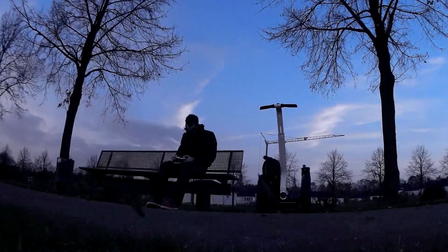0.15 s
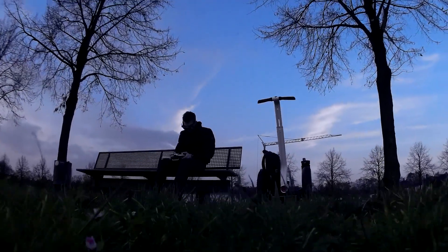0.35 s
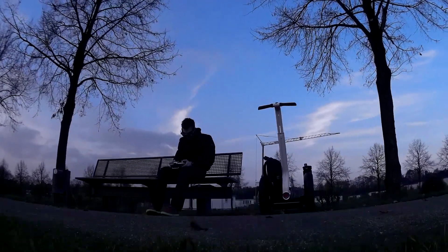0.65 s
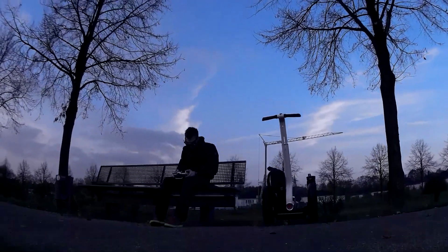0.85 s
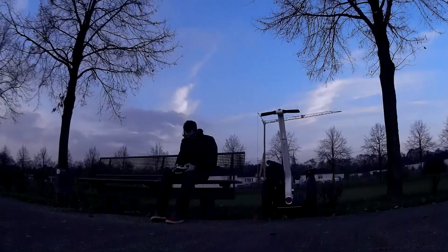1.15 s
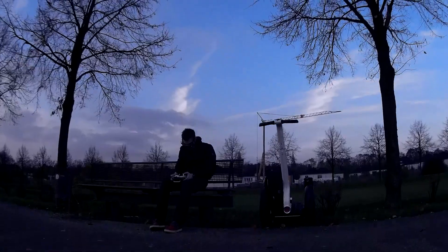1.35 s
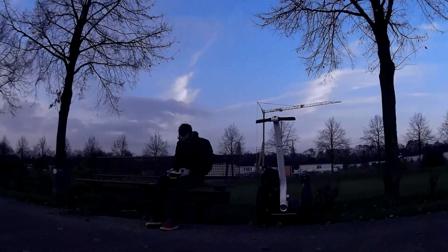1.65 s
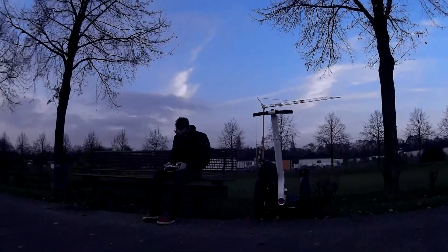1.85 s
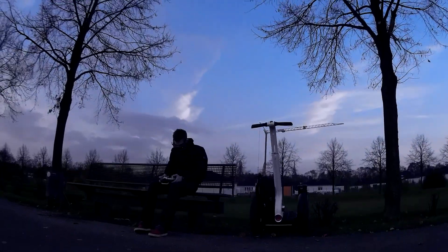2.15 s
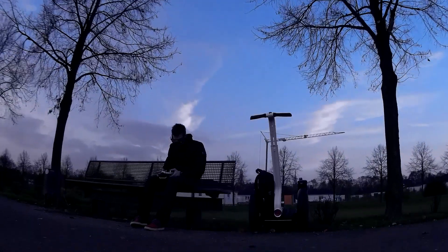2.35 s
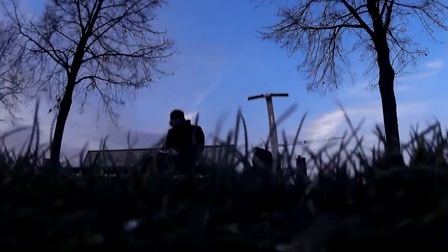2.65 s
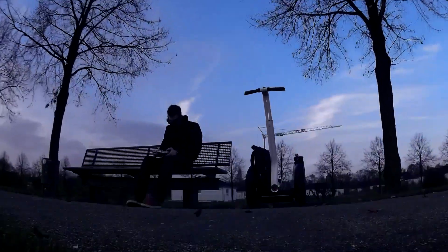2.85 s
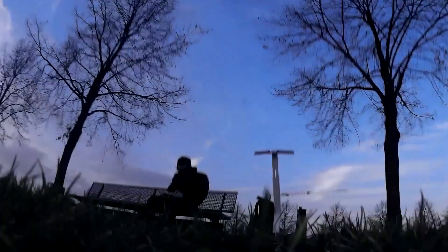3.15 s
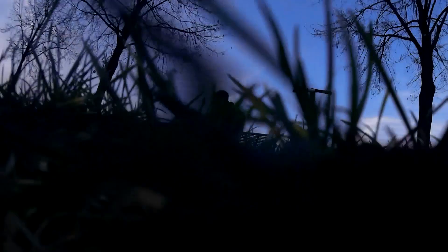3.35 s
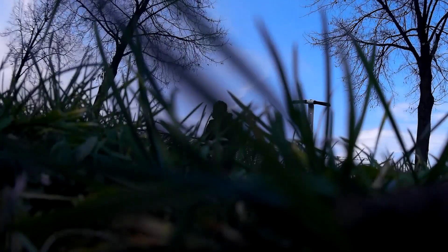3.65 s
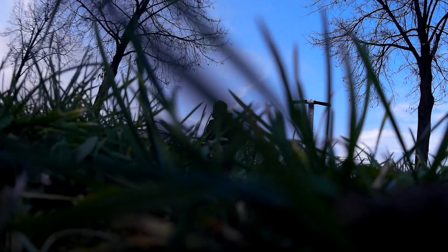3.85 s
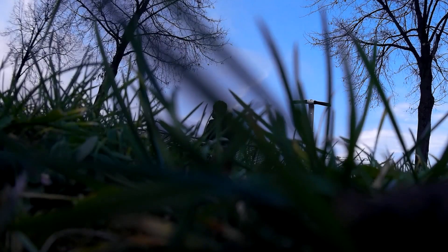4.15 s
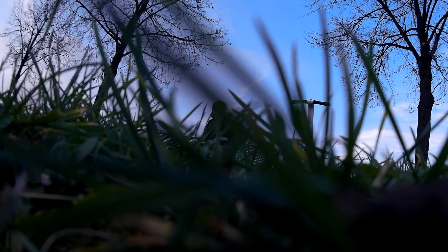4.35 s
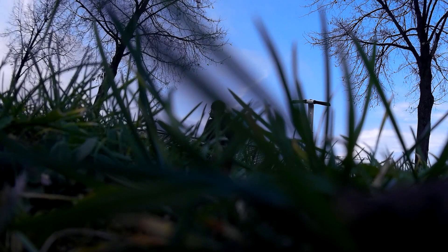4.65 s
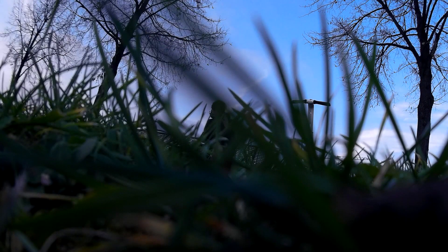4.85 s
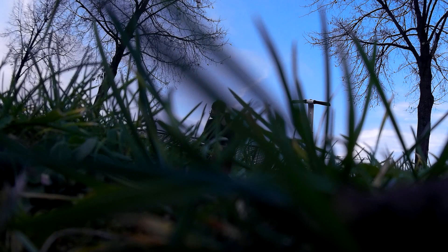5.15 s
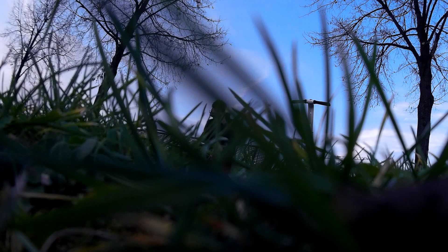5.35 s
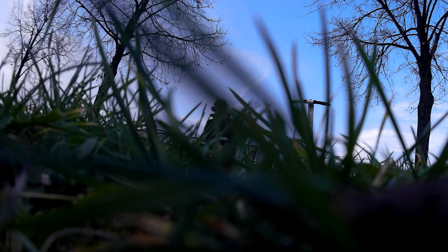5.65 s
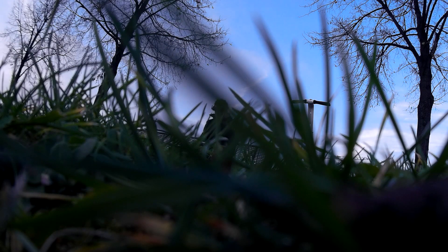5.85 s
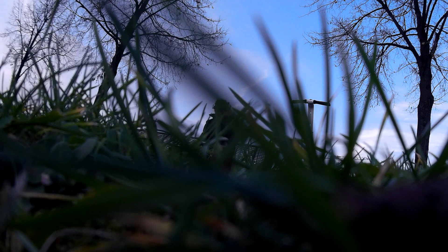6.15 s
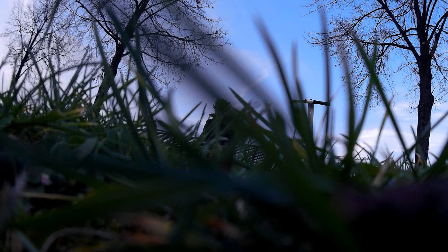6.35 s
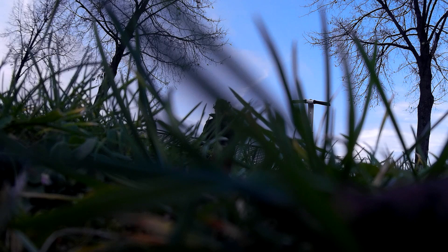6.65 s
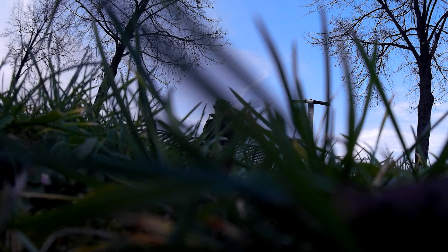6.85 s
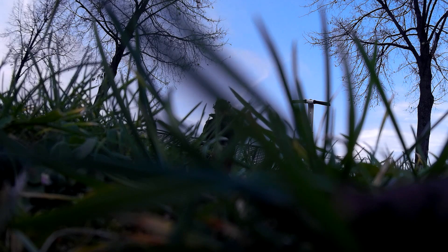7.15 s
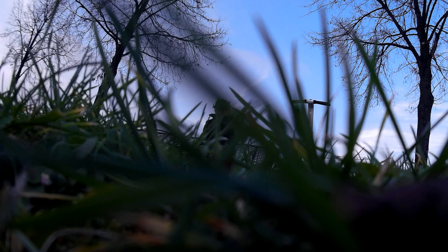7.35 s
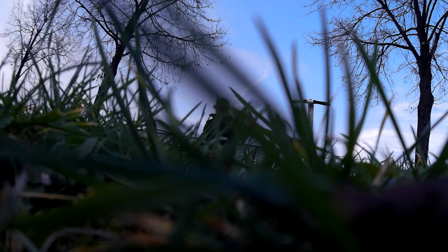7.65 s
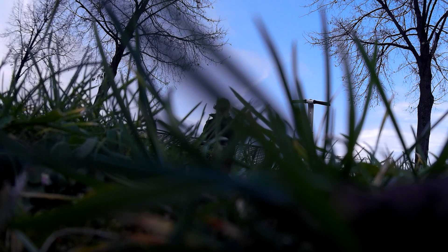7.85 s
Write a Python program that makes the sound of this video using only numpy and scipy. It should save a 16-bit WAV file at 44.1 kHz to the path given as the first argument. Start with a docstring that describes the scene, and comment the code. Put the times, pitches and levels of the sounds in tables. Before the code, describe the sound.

Four beating drone motors hover, scrape down into long grass, thrash and snap stalks, then stop, leaving quiet far-off road noise.

```python
"""Small quadcopter hovering low, heard from on board: four motors beat against each other.
Each motor sums blade tone, overtones, shaft lines and magnetic whine; filtered noise adds wash and wind.
It dips through its own downwash, throttles back, brushes the ground and drops into long grass.
Idling propellers thrash and snap stalks: random hits through frame and blade resonances.
Motors run down; an arm rings, faint high hiss in narrow bands comes and goes, traffic noise stays."""
import sys
import numpy as np
from scipy.fft import rfft, irfft, next_fast_len
from scipy.io import wavfile
from scipy.ndimage import map_coordinates

SR = 44100
rng = np.random.default_rng(int(sys.argv[2]) if len(sys.argv) > 2 else 0)


def unload_wav(signal):
    """Save mono or channel-first audio to the path in sys.argv[1] as 16-bit WAV at rate SR, clipped to [-1, 1]."""
    wavfile.write(
        sys.argv[1],
        SR,
        np.round(np.clip(np.atleast_2d(signal).T, -1, 1) * 32767).astype(np.int16),
    )


N = 353241

# frame resonances: f/Hz, width/Hz, relative level/dB
FRAME_MODES = [(897, 27, 3), (1123, 22, 13), (1345, 78, 2.5), (1792, 40, 3), (2562, 25, -6.5),
               (4583, 120, -28)]
# struck propeller blade resonances: f/Hz, width/Hz, relative level/dB
BLADE_MODES = [(2641, 52, 1), (4480, 85, -12.5)]
# low-frequency air and thud noise spectrum: f/Hz, relative density/dB
AIR_SPECTRUM = [(8.8, -29), (15, 1), (91, -2), (123, -2), (204, -5), (275, -15), (330, -2), (430, -32.5),
                (730, -120)]

HOVER_HZ, IDLE_HZ = 400, 110  # reference blade rates
LAND_S, OFF_S = 3.24, 4.28  # landing, power cut
LET_GO_S = 0.069  # grass contact eases over this time after power cut


def amp(db):
    """Decibels to gain."""
    return 10 ** (np.asarray(db) / 20)


def unit(x):
    """Scale to rms 1."""
    return x / np.sqrt(np.mean(x ** 2) + 1e-20)


def decades(rate, reference):
    """Speed in powers of ten above a reference."""
    return np.log10(rate / reference + 1e-6)


def curves(rows):
    """Interpolate each column after the time, per sample."""
    time_s, *columns = np.transpose(rows)
    return [np.interp(np.arange(N) / SR, time_s, column) for column in columns]


def during(start_s, end_s, fade_s):
    """1 from start to end, linear fades to 0 outside."""
    t = np.arange(N) / SR
    return np.clip(1 + np.minimum(t - start_s, end_s - t) / fade_s, 0, 1)


def ramp(start_s, length_s):
    """0 before start, rising linearly to 1 over the length."""
    return np.clip((np.arange(N) / SR - start_s) / length_s, 0, 1)


def swell(centre_s, sigma_s):
    """Gaussian swell, peak 1."""
    return np.exp(-.5 * ((np.arange(N) / SR - centre_s) / sigma_s) ** 2)


def wobble(knots_per_s):
    """Smooth random curve: spline through normal knots."""
    knots = rng.standard_normal(SR // 10)
    coarse = np.arange(0, N, 16)
    values = map_coordinates(knots, [coarse * knots_per_s / SR], mode="mirror")
    return np.interp(np.arange(N), coarse, values)


def filtered(x, response):
    """Multiply the spectrum of x by a response of frequency."""
    m = next_fast_len(N + SR // 2)
    return irfft(rfft(x, m) * response(np.fft.rfftfreq(m, 1 / SR)), m)[:N]


def shaped(x, spectrum):
    """Filter x by f/Hz, gain/dB points on a log frequency axis."""
    f, db = np.transpose(spectrum)
    return filtered(x, lambda hz: amp(np.interp(np.log(hz + 1), np.log(f), db)))


def ring(x, modes):
    """Parallel second-order resonances of alternating sign."""
    def response(f):
        total = 0
        for k, (centre, width, db) in enumerate(modes):
            damping = 1j * f * width
            total = total + (-1) ** k * amp(db) * damping / (centre * centre - f * f + damping)
        return total
    return filtered(x, response)


def noise(spectrum):
    """Coloured noise of rms 1."""
    return unit(shaped(rng.standard_normal(N), spectrum))


def speed(pair, share, steer, braked_s, settle_s, idle_hz, off_s, run_down_s, exponent):
    """Blade rate/Hz: follows throttle, is braked, freewheels to idle, runs down when switched off."""
    # hover blade rates: t/s, faster pair/Hz, steering trim (+ on one, - on the other)/Hz, slower pair/Hz
    throttle = [(0, 418, 31, 356), (.16, 436, 30, 356), (.35, 482, 23, 394), (.56, 480, 16, 422),
                (.73, 472, 11, 427), (.86, 453, 13, 388), (.95, 441, 19, 375), (1.01, 475, 21, 385),
                (1.15, 469, 17, 398), (1.44, 438, 14.7, 374), (1.55, 438, 10, 373), (1.67, 436, 10.5, 371),
                (1.86, 424, 8, 367), (1.95, 435, 8.5, 372), (2.06, 414, 8.5, 370), (2.15, 424, 8, 368),
                (2.44, 414, 13, 359), (2.6, 425, 19, 362), (2.76, 420, 20, 358), (2.82, 450, 25, 352)]
    brake_s, freewheel_hz = 2.82, 180  # start of braking, blade rate at its end
    t = np.arange(N) / SR
    faster, trim, slower = curves(throttle)
    hover = share * (slower if pair else faster) + steer * trim
    flying = hover + (freewheel_hz - hover) * ramp(brake_s, braked_s - brake_s)
    powered = idle_hz + (flying - idle_hz) * np.exp(-np.maximum(t - braked_s, 0) / settle_s)
    return powered * (1 - ramp(off_s, run_down_s)) ** exponent


def motor(rate, mean_rate, sway_db, sweep, voice, unbalance_db):
    """Two-bladed rotor: blade tone, overtones, odd shaft orders from unbalance, magnetic whine."""
    # overtones from twice the blade rate upward: relative level/dB
    orders_db = [2.5, -3, -9.5, -3.5, -7, -14.5, -12.5, -14, -23.5, -22, -28.5, -31, -35.5]
    # airframe radiation of overtones: f/Hz, gain/dB
    airframe = [(150, -4), (560, -1.5), (740, -1.5), (840, 0.5), (960, -4.5), (1100, -4), (1220, 7.5),
                (1400, -7.5), (1700, 4), (2200, -13.5), (2600, -9.5), (6000, -9)]
    # overtone level over the flight: t/s, level/dB
    load = [(0, -19), (.2, -23), (.5, -23), (.75, -25.5), (.9, -19.5), (1.1, -24), (1.6, -24.5), (2, -23),
            (2.55, -22), (2.7, -32), (2.92, -24.5), (3.06, -32), (3.3, -25)]
    # airframe radiation of whine: f/Hz, gain/dB
    whine_colour = [(180, -60), (310, -28), (400, -15), (460, -12.5), (560, -19), (700, -10), (820, -2),
                    (970, -2), (1040, -11), (1150, -0.5), (1480, -15.5), (1650, -0.5), (1980, -2),
                    (2300, -16.5), (4200, -28.5), (5400, -43)]
    # hard braking swells the blade tone: t/s, sigma/s, boost/dB
    braking = (2.975, 0.023, 12)
    # rotor slips free of the grass, whine swells: t/s, sigma/s, boost/dB
    slip = (4.245, .04, 8)
    # whine stutters as motors run down: t/s, sigma/s, gain/dB
    stutters = [(4.32, .012, -10.5), (4.431, 0.0059, -5), (4.47, 0.0037, -9), (4.61, 0.0085, -3)]
    tone_db_per_decade, overtone_db_per_decade = 62.5, 34
    tone_db, blade_db, air_db, grass_db, free_db = voice

    angle = 2 * np.pi * np.cumsum(rate * (1 + 0.002024 * wobble(120))) / SR
    tone_db = tone_db + sway_db + braking[2] * swell(*braking[:2])
    tone_db = tone_db + tone_db_per_decade * decades(rate, HOVER_HZ)
    tone = (amp(tone_db) + sweep) * amp(2.94 * wobble(60)) * np.sin(angle)

    def partial(order, db):
        # turbulent inflow makes each partial flutter on its own
        return amp(db + 3 * wobble(50)) * np.sin(order * angle + rng.uniform(0, 2 * np.pi))

    blades = sum(partial(k + 2, db + blade_db) for k, db in enumerate(orders_db))
    # shaft turns at half the blade rate: odd lines lie halfway between
    shaft = sum(partial(k + .5, db) for k, db in enumerate(unbalance_db))
    turning = np.minimum(rate / 20, 1)
    thrust = amp(curves(load)[0] + overtone_db_per_decade * decades(mean_rate, HOVER_HZ))
    overtones = shaped(turning * thrust * (blades + shaft), airframe)

    # grass damps the idling whine and makes it waver
    landed, off = ramp(LAND_S - .06, .06), ramp(OFF_S, LET_GO_S)
    whine_db = air_db + (grass_db - air_db) * landed + (free_db - grass_db) * off
    whine_db = whine_db + slip[2] * swell(*slip[:2])
    whine_db = whine_db + sum(db * swell(s, sigma) for s, sigma, db in stutters)
    whine_db = whine_db + (4.0 + 2.1 * off) * wobble(70).clip(-1.5, 1.5)
    tugs_rad = .8 * (0.32 + .7 * landed - 0.42 * off) * wobble(70)
    pole_angle = 12 * angle + tugs_rad
    poles = np.sin(pole_angle) + amp(-13) * np.sin(pole_angle / 2)  # with octave below
    whine = shaped(turning * amp(whine_db) * poles, whine_colour)
    return np.sqrt(2) * (tone + overtones + whine)


def motors(rates):
    """Four motors at differing speeds beat; the second sways in level and sweeps the grass."""
    # per motor: blade tone/dB at hover rate, overtones/dB, whine/dB in air, in grass, running down
    voices = [(-18, -8, -21.5, -31, -17), (-15.5, -0.5, -30, -34, -31.5), (-24, -7.5, -23.5, -30, -27),
              (-36, -16.5, -30.5, -30.5, -36.5)]
    # per rotor unbalance: level/dB at 1, 3, 5, 7 times shaft rate
    unbalance = [(-12.5, -24, -12.5, -11.5), (-2.5, -14.5, -9.5, -15.5), (-10, -4, -3.5, -10),
                 (-8.5, -9, -15, -14.5)]
    # second motor's blade tone: t/s, gain/dB
    sway = [(0, -3.5), (.36, 0), (.75, 1.5), (.95, -4.5), (1.02, 2.5), (1.25, 1.5), (1.6, 2), (1.96, -2),
            (2.07, -19.5), (2.47, -9), (2.6, -1.5), (2.85, -0.5)]
    # hum of second rotor sweeping the grass: t/s, level/dB
    grass_sweep = [(3.1, -44), (3.25, -36), (3.7, -34), (3.87, -34), (3.97, -41), (4.3, -53)]
    sweeping = during(grass_sweep[0][0], grass_sweep[-1][0], .06)
    sways_db = [0, curves(sway)[0], 0, 0]
    sweeps = [0, sweeping * amp(curves(grass_sweep)[0]), 0, 0]
    mean_rate = rates.mean(axis=0)
    settings = zip(rates, sways_db, sweeps, voices, unbalance)
    return sum(motor(rate, mean_rate, *rest) for rate, *rest in settings)


def wash(rate):
    """Blade turbulence rushes and hisses with speed, more in downwash, which buffets the microphone."""
    # rush noise spectrum: f/Hz, relative density/dB
    body_spectrum = [(60, -27), (170, -5.5), (300, -5.5), (600, -3), (900, 5.5), (1350, -0.5), (1800, 1.5),
                     (2050, -5), (2300, -10.5), (2600, -9), (3000, -16.5), (3800, -16), (5000, -34),
                     (8000, -58.5)]
    # hiss noise spectrum: f/Hz, relative density/dB
    hiss_spectrum = [(2500, -3.5), (4000, 5.5), (5000, -3), (5800, 3.5), (6700, -7.5), (7800, -5.5),
                     (8700, -12), (9700, -1.5), (10800, -13.5), (11900, -7), (13300, -16.5), (15200, -26.5)]
    # dips into own downwash: start/s, end/s, fade/s, rush boost/dB, hiss boost/dB, buffet boost/dB
    downwash = [(0.176, 0.586, 0.21, 1.5, 8.5, 13), (2.62, 2.83, 0.14, 1, 7, 21.5),
                (2.92, 2.99, 0.036, 0.5, 6.5, 13), (3.17, 3.199, 0.055, 0, 33, 5)]
    # puffs of air on the microphone: t/s, sigma/s, level/dB
    air_puffs = [(.44, .018, -26.5), (.54, .015, -29), (2.7, .018, -13.5), (2.73, 0.012, -17),
                 (3.185, .02, -14.5), (3.261, .02, -27.5)]
    fast = decades(rate, HOVER_HZ)
    airborne = 1 - ramp(LAND_S - .06, .06)
    boosts_db = np.zeros((3, N))
    for start, end, fade, *dbs in downwash:
        boosts_db += np.outer(dbs, during(start, end, fade))
    rush_db, hiss_db, buffet_db = boosts_db
    # base levels: calm hover; speed slopes in dB per decade
    body = amp(-17 + rush_db + 20 * fast + 0.84 * wobble(90)) * noise(body_spectrum)
    hiss = amp(-35 + hiss_db + 48 * fast + 1.1 * wobble(300)) * noise(hiss_spectrum)
    wind = amp(-38 + buffet_db + 20 * fast + 2.5 * wobble(14))
    puffs = sum(amp(db) * swell(s, sigma) for s, sigma, db in air_puffs)
    lumps = amp(1.8 * wobble(30))
    return airborne * (body + hiss) + (airborne * wind + puffs) * lumps * noise(AIR_SPECTRUM)


def thrash(rate):
    """Random grass hits ring frame and blades; slower rotors hit less often and more softly."""
    # grass hit colour: f/Hz, gain/dB
    grass_spectrum = [(60, -21), (130, -20), (190, -8.5), (300, -6), (500, -5), (750, -3.5), (1000, 0),
                      (1400, -1), (1800, -2.5), (2050, -8), (2250, -26.5), (3000, -30.5), (4000, -25.5),
                      (6000, -53)]
    # blade-tip flick noise spectrum: f/Hz, relative density/dB
    flick_spectrum = [(2000, -18), (3000, -6.5), (4500, 2.5), (6200, -6.5), (6900, -12.5), (7800, -5.5),
                      (9000, -18.5), (10000, -8.5), (11300, -22.5), (14000, -28.5), (15200, -47.5)]
    hits_per_s, sink_s = 900, .17  # hit rate at idle or faster, time to sink into the grass
    fast = decades(rate, IDLE_HZ)
    shallow, off = 1 - ramp(LAND_S, sink_s), ramp(OFF_S, LET_GO_S)

    struck = rng.random(N) < np.minimum(rate / IDLE_HZ, 1) * hits_per_s / SR
    hits = struck * rng.choice([-1, 1], N) * amp(2.0 * rng.standard_normal(N))
    body = amp(0.5) * unit(shaped(hits, grass_spectrum)) + amp(1.0) * unit(ring(hits, FRAME_MODES))
    blade = unit(ring(hits, BLADE_MODES))
    flicks = unit(noise(flick_spectrum) * amp(3.5 * wobble(260).clip(-2, 2)))

    # gain at idle, slope in dB per decade of speed, shallow and power-off changes
    body_db = -23.5 + 12.5 * fast - 7 * shallow - 6.5 * off
    blade_db = -32.5 + 25.5 * fast - 15 * shallow - 17 * off + 1.5 * wobble(30)
    flick_db = -38.5 + 15.5 * fast - 13 * shallow - 17 * off + 1.5 * wobble(8.5)
    mix = amp(body_db) * body + amp(blade_db) * blade + amp(flick_db) * flicks
    return ramp(LAND_S - .02, .02) * mix


def slaps():
    """Thicker stalks snap against a propeller: noise bursts knock the frame, impulses ring the blade."""
    # stalks hit: t/s, relative snap level/dB, relative blade ring level/dB
    stalks = [(3.112, -29, -45), (3.136, -16, -40), (3.3124, -11, -25.5), (3.4092, -14.5, -24),
              (3.4291, -14.5, -33), (3.6446, -12, -24), (3.6574, -17, -21), (3.6691, -16, -22),
              (3.8272, -15, -25.5), (3.8594, -19, -27), (3.8821, -15, -21), (3.8954, -12, -19),
              (3.9111, -16.5, -22), (3.9519, -19, -28), (3.97, -21, -34), (3.9938, -17, -25.5),
              (4.0532, -19, -16.5), (4.0632, -14, -14), (4.085, -12, -18), (4.121, -29, -5),
              (4.1724, -13, -22), (4.1885, -22.5, -27), (4.2318, -18.5, -22), (4.2597, -17, -22),
              (4.2844, -17.5, -19.5), (4.3175, -31, -37.5), (4.3482, -23, -34), (4.3742, -25.5, -41),
              (4.3887, -28, -44), (4.4765, -33.5, -45), (4.4946, -39, -40), (4.546, -30, -49),
              (4.5788, -36, -50), (4.6094, -31, -29), (4.655, -31, -35), (4.6645, -26, -37),
              (4.7044, -47, -39)]
    # snap colour: f/Hz, gain/dB
    snap_spectrum = [(1500, -12), (2800, 2.5), (4500, -1.5), (6300, -8), (8000, -14), (10200, -18.5),
                     (11500, -26.5), (14000, -37), (15200, -51.5)]
    t60_s, snap_gain_db, pluck_gain_db = 0.019, 4, 37
    knock_db, knock_db_per_snap_db = -5, .33
    t = np.arange(SR // 20) / SR
    snaps, knocks, plucks = np.zeros((3, N))
    for time_s, snap_db, blade_db in stalks:
        burst = rng.standard_normal(len(t)) * amp(-60 * t / t60_s)
        start = round(time_s * SR)
        snaps[start:][:len(t)] += amp(snap_db + snap_gain_db) * burst
        knocks[start:][:len(t)] += amp(knock_db + knock_db_per_snap_db * snap_db) * burst
        plucks[start] += amp(blade_db + pluck_gain_db)
    return shaped(snaps, snap_spectrum) + ring(knocks, FRAME_MODES) + ring(plucks, BLADE_MODES)


def bumps():
    """Brushes with the ground: swells of rough scraping noise over a low thud."""
    # brushes: t/s, sigma/s, scrape level/dB, thud level/dB
    brushes = [(2.75, 0.016, -4, -8), (3.17, 0.013, -19.5, -28), (3.179, 0.014, -11, -20.5),
               (3.207, 0.012, 2, -11.5), (3.247, .02, -26.5, -20), (3.409, 0.00501, -17, -40),
               (3.466, 0.0065, -18, -36)]
    # scraping noise spectrum: f/Hz, relative density/dB
    scrape_spectrum = [(88, -38), (150, -17), (359, -8.5), (461, -6), (841, -0.5), (1480, 0.5), (2090, -9),
                       (3400, -12), (3670, -13.5), (5730, -22), (15400, -39)]
    scrape = unit(noise(scrape_spectrum) * amp(5.4 * wobble(350)))
    thud = noise(AIR_SPECTRUM)
    total = np.zeros(N)
    for s, sigma, scrape_db, thud_db in brushes:
        total += swell(s, sigma) * (amp(scrape_db) * scrape + amp(thud_db) * thud)
    return total


def arm():
    """Low bending mode of a motor arm: a wavering sine swells as rotors run down and outlasts them."""
    # swells: t/s, sigma/s, level/dB
    arm_swells = [(4.28, 0.035, -34), (4.583, 0.089, -41.5), (4.767, 0.036, -46.5)]
    bend_hz = 275
    level = sum(amp(db) * swell(s, sigma) for s, sigma, db in arm_swells)
    return level * unit(np.sin(2 * np.pi * bend_hz * np.arange(N) / SR + .3 * wobble(25)))


def high_hiss():
    """Faint narrow-band high hiss in short spells."""
    # spells: start/s, end/s, level/dB
    hiss_spells = [(4.617, 4.807, -65), (5.6, 5.93, -69.5), (6.603, 6.82, -71), (7.602, 7.808, -70.5)]
    # bands: f/Hz, width/Hz, relative level/dB
    bands = [(5730, 280, -5), (8170, 210, -0.5), (11400, 110, -5)]
    level = sum(amp(db) * during(start, end, .015) for start, end, db in hiss_spells)
    return level * unit(ring(rng.standard_normal(N), bands))


def traffic():
    """Far road: nearly steady coloured noise."""
    # traffic noise spectrum: f/Hz, relative density/dB
    road_spectrum = [(20, -3.5), (60, 6), (130, -1), (250, -4.5), (400, -12), (600, -6.5), (800, -3.5),
                     (1080, -1), (1400, -5.5), (1700, -13), (2050, -30), (3000, -33.5), (8000, -34.5),
                     (14000, -36.5)]
    return amp(-47.0 + 0.26 * wobble(1.3)) * noise(road_spectrum)


def scene():
    """Mono sum; rotor speeds drive motors, wash and thrashing."""
    # per motor: pair (0 faster, 1 slower), share of pair rate, share of trim, braked until/s, settling/s,
    # idle blade rate/Hz, run-down start/s, run-down length/s, run-down exponent
    motor_speeds = [(0, 1, 1, 3.035, .072, 135, 4.275, .57, 1.3), (0, 1, -1, 3.02, .055, 100, 4.3, .5, .9),
                    (1, 1, 0, 2.95, .07, 96, 4.27, .5, 1.2), (1, .9, 0, 3.02, .05, 114, 4.3, .45, .3)]
    rates = np.array([speed(*row) for row in motor_speeds])
    mean_rate = rates.mean(axis=0)
    drone = motors(rates) + wash(mean_rate)
    contact = thrash(mean_rate) + slaps() + bumps()
    return (drone + contact + arm() + high_hiss() + traffic())[None]


def record(dry):
    """Soft-limit the loudest peaks, then low-pass steeply."""
    limit, top_hz = 1.03, 15400
    rounded = dry[0] / (1 + np.abs(dry[0] / limit) ** 8) ** (1 / 8)
    return filtered(rounded, lambda hz: 1 / (1 + (hz / top_hz) ** 180))[None]


dry = scene()
out = record(dry)
unload_wav(out)
```